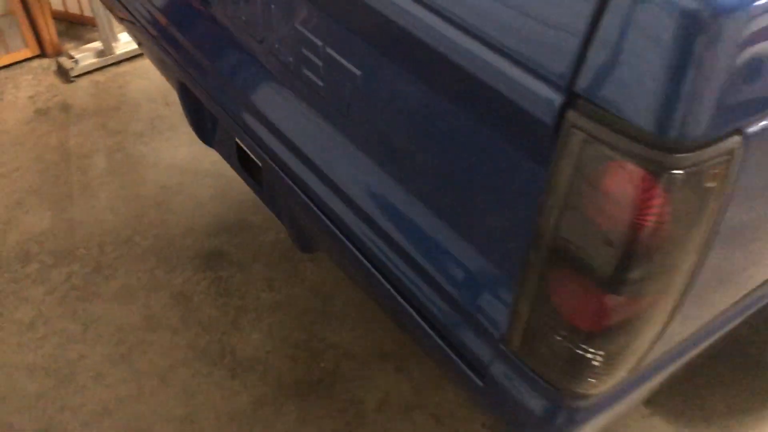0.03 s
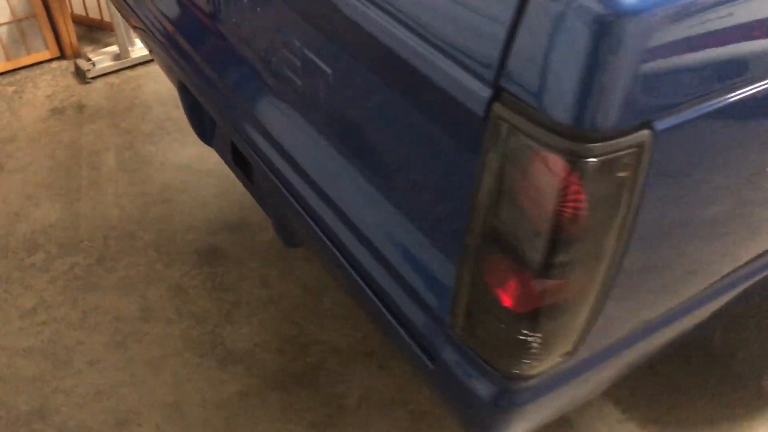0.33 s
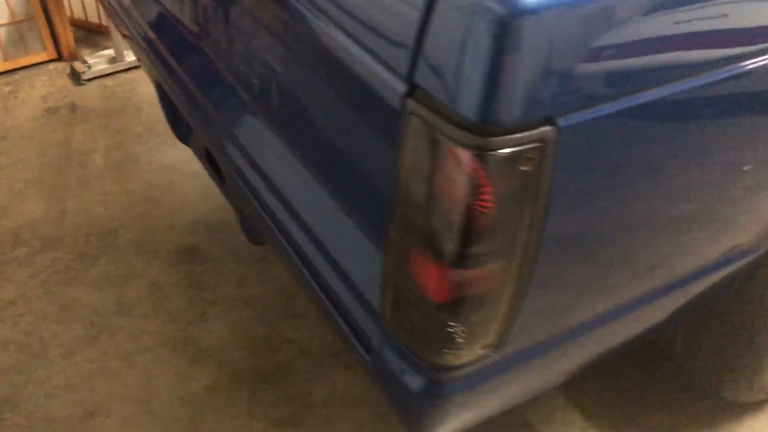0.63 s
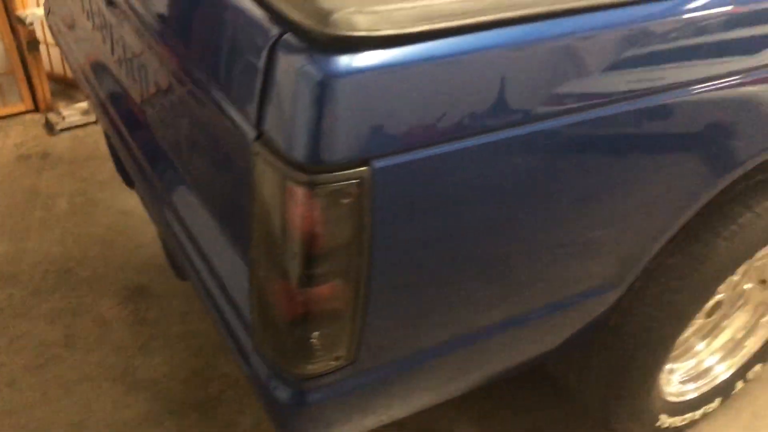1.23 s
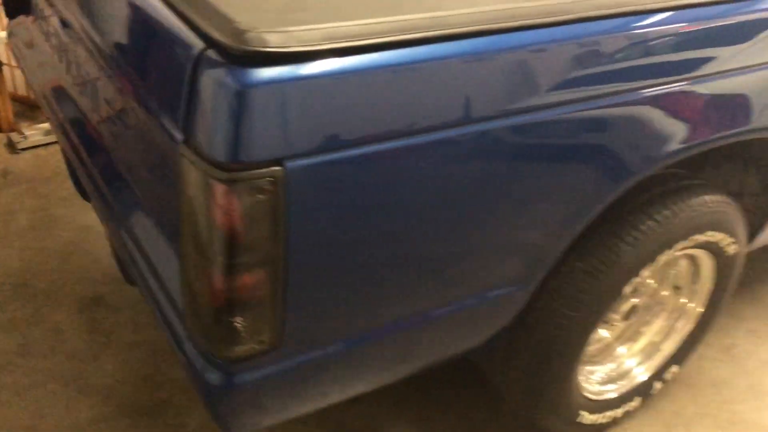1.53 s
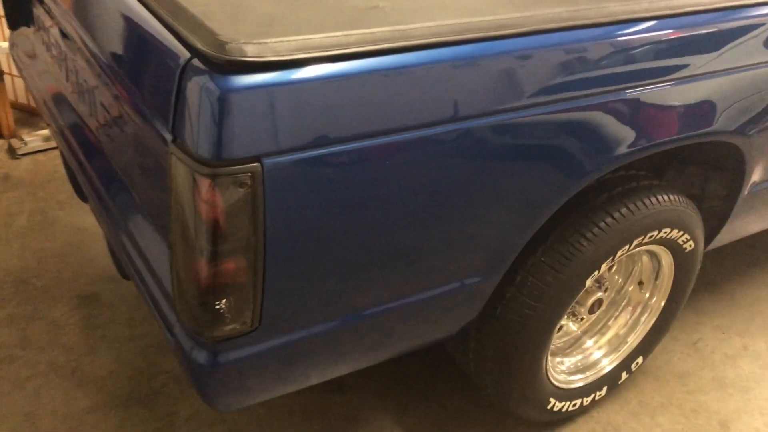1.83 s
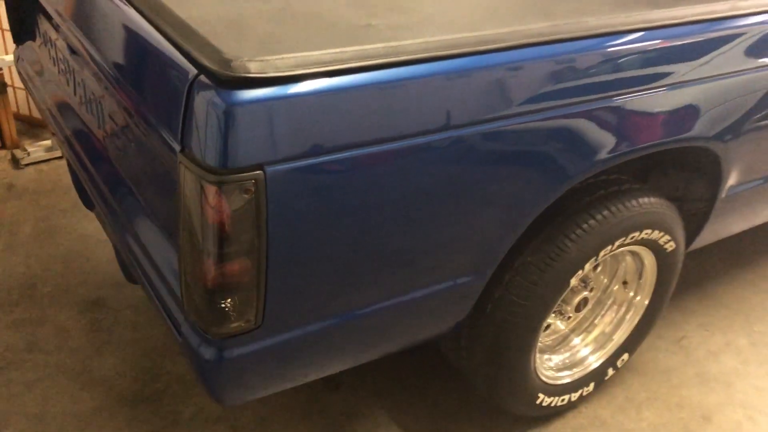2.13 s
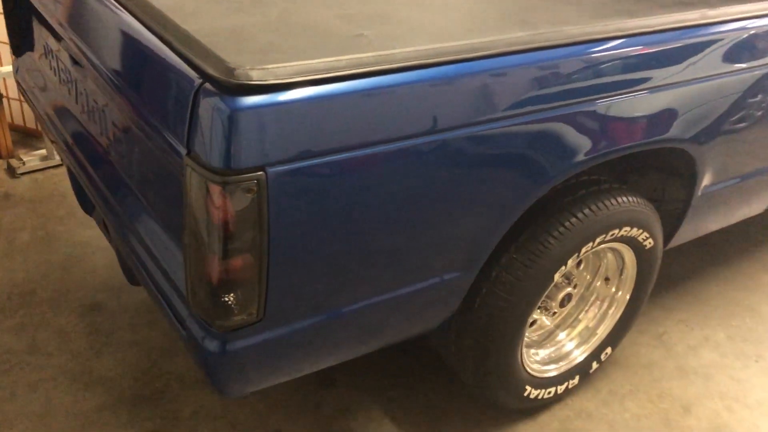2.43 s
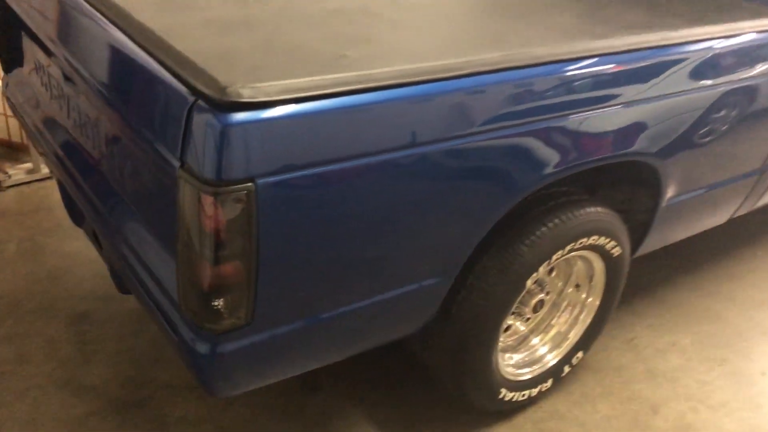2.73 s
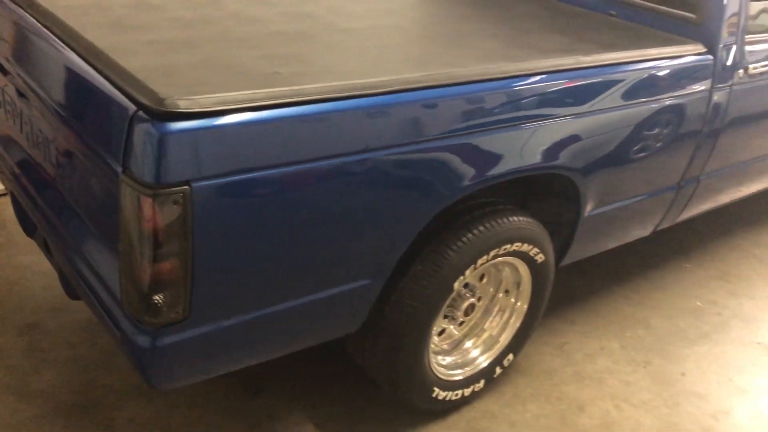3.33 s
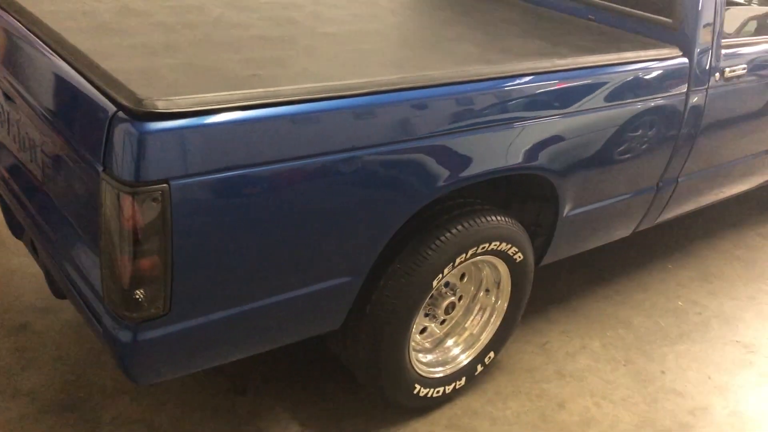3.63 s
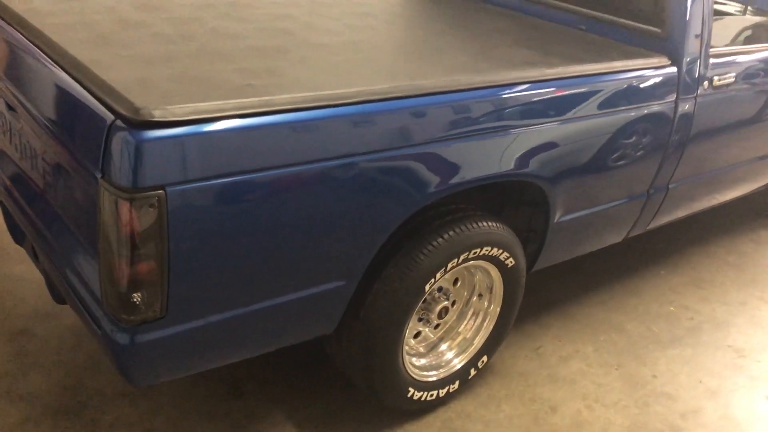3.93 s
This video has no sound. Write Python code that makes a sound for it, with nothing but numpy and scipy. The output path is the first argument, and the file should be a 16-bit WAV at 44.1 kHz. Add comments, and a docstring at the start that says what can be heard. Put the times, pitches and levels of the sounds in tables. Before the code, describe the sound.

A truck engine idles with a deep, pulsing rumble, heard close behind the exhaust in a garage. The microphone walks round to the side, where the drone eases and faint ticking joins the metal rattle and steady hiss.

```python
"""A V8 pickup idles in a garage, heard while walking from the tailgate round to its side.
At first the exhaust is close: it drones at the firing rate, lopes with the uneven pulses of the two
banks, and every firing thuds and rings in the pipe, while a loose metal shield buzzes. Towards the
corner, near two seconds in, the chugs shift their balance and a valve tick comes forward. At the side
the drone is softer. All the way, engine-bay metal rings faintly and fan and belts hiss."""
import sys
import numpy as np
from scipy import signal
from scipy.fft import rfft, irfft
from scipy.io import wavfile

SR = 44100
rng = np.random.default_rng(int(sys.argv[2]) if len(sys.argv) > 2 else 0)


def int16_out(signal):
    """Quantize to a 16-bit WAV file."""
    q = np.round(np.clip(np.atleast_2d(signal).T, -1, 1) * 32767)
    wavfile.write(sys.argv[1], SR, q.astype(np.int16))


N = 176400
T = np.arange(N) / SR
CYLINDER_COUNT = 8
TICK_PLACE = .59   # share of an engine cycle


def exhaust_drone(cycle, waver_hz=4.8, start_place=.1169, fade_db_per_s=.7):
    """Exhaust orders, multiples of the cycle rate: four strong ones beat into the lope, weak ones fill in."""
    # Each row: time in seconds, then the level in dB of each of the four strong orders.
    strong_levels = [(0, -13.5, -57, -27, -22), (0.5, -15, -49, -28, -24.5), (1.0, -15.5, -30, -30, -22.5),
                     (1.45, -15.4, -29, -36, -27), (2.0, -17, -25.5, -32, -29),
                     (2.45, -16, -26.5, -32, -28), (2.9, -18, -24, -28, -31), (3.35, -17, -25, -31, -28),
                     (4, -19.5, -24, -28.5, -31.5)]
    # Each row: a weak order, its level in dB halfway through the walk.
    weak_orders = [(6, -56), (7, -48), (9, -36), (10, -44), (12, -44), (14, -48), (15, -41.5), (17, -44.5),
                   (19, -57), (21, -42)]
    out = 0
    for order, db in zip((8, 11, 13, 16), in_time(strong_levels)):
        gain = from_db(db + .4 * drift(waver_hz))
        out += gain * np.sin(2 * np.pi * order * (cycle - start_place))
    for order, db in weak_orders:
        gain = from_db(db + 1.8 * drift(waver_hz / 2) - fade_db_per_s * (T - T.mean()))
        out += gain * np.sin(2 * np.pi * (order * cycle + rng.random()))
    return np.sqrt(2) * out


def exhaust_chugs(cycle, spread_db=1.35, jitter_s=.00023):
    """The same uneven blows come round every cycle, each booming in one exhaust resonance."""
    # Each row: place as a share of the cycle, pitch in Hz, swell time in seconds,
    # then peak level in dB behind the truck, at its corner and at its side.
    chugs = [(0.1671, 202, 0.0064, -27, -25, -32), (.31, 298.5, .0035, -24, -28.5, -35.5),
             (.975, 260.3, 0.0041, -29.5, -27.5, -30.5), (.49, 274, 0.0045, -29.5, -35, -33),
             (.59, 196, 0.0073, -31.5, -31, -33.5), (.81, 193, 0.016, -30, -41, -46),
             (.63, 292, 0.0026, -32, -37.5, -31), (.94, 633, 0.0053, -31.5, -37, -46),
             (0.0899, 638, 0.0081, -42.5, -35, -43), (0.58, 565, 0.0062, -33.5, -39.5, -45),
             (.61, 635, 0.0039, -43, -35.5, -45), (.85, 644, 0.0047, -34.5, -47, -44)]
    walk_s = (.44, 1.83, 3.84)   # the listener is behind, at the corner, at the side
    out, t = 0, T[:SR // 10]
    for place, hz, swell, *levels in chugs:
        times = passing(cycle, place + np.arange(int(cycle[-1] + 1)))
        jitter, spread = rng.standard_normal((len(times), 2)).T
        blows = clicks(times + jitter_s * jitter, np.interp(times, walk_s, levels) + spread_db * spread)
        boom = t / swell * np.exp(1 - t / swell) * np.sin(2 * np.pi * hz * t)
        out += signal.fftconvolve(blows, boom)[:N]
    return out


def pipe_tones(cycle, waver_db=1.86, wander_rad=.83):
    """Higher exhaust orders sing in the pipe's resonances: hollow, wavering tones over the drone."""
    # Each row: time in seconds, then the level in dB of each of the four singing orders.
    tone_levels = [(0, -40, -50, -55, -38), (.25, -50, -61, -49, -46), (.42, -45, -59.5, -39, -49),
                   (.75, -46, -53, -51, -49.5), (1.4, -48, -51, -59, -45.5), (2.3, -47, -60, -54, -52),
                   (3.1, -45, -51.5, -62, -48), (3.4, -43.5, -49, -50, -54), (4, -42, -54, -55, -52)]
    out = 0
    for order, db in zip((32, 60, 65, 72), in_time(tone_levels)):
        gain = from_db(db + waver_db * drift(11.3))
        out += gain * np.sin(2 * np.pi * order * cycle + wander_rad * drift(6))
    return np.sqrt(2) * out


def firings(cycle, start_place=.015, spread_db=2, jitter_s=.00015, roughness=.38, hiss_db=-48.5):
    """Each cylinder's pressure pulse and turbulent puff ring the tailpipe, with a short hiss of gas."""
    # The accent of each of the eight firings in a cycle, in dB.
    accents = [2, -1, -1.7, -1.6, -0.68, 2.3, -0.69, -0.3]
    # Tailpipe resonances. Each row: pitch in Hz, width in Hz, relative level in dB.
    pipe_modes = [(284.8, 25, 0), (351.3, 43, -3), (396, 25, -3.5), (519, 22, -1.5), (567.5, 35, -3.5),
                  (637.3, 25, -1.5), (705, 11, -16), (900, 52, -13.5)]
    # Fader for the pipe's ring. Each row: time in seconds, level in dB.
    ring_level = [(0, -42.5), (1.4, -45), (2.5, -45), (4, -45)]
    # Colour of the gas hiss. Each row: frequency in Hz, relative density in dB.
    hiss_colour = [(200, -19), (450, 4.5), (900, -2.5), (1500, -8), (3000, -11), (7000, -17),
                   (15000, -29.5)]
    firing = np.arange(int(cycle[-1] + 1) * CYLINDER_COUNT)
    jitter, spread = rng.standard_normal((len(firing), 2)).T
    times = passing(cycle, start_place + firing / CYLINDER_COUNT) + jitter_s * jitter
    pulses = clicks(times, np.array(accents)[firing % CYLINDER_COUNT] + spread_db * np.tanh(spread))
    turbulence = die_away(pulses, seconds=.0062) * rng.standard_normal(N)
    ring = resonate(rms_one(pulses) + roughness * rms_one(turbulence), pipe_modes)
    hiss = die_away(pulses, seconds=.0088) * noise(hiss_colour)
    return from_db(in_time(ring_level)[0]) * rms_one(ring) + from_db(hiss_db) * rms_one(hiss)


def loose_shield(cycle, touches_per_s=500, spread_db=3.5, shake_db=2, lift_db=1):
    """The engine shakes a sheet-metal shield: many light touches blur into a buzz, a few hit hard."""
    # Modes of the sheet. Each row: pitch in Hz, width in Hz, relative level in dB.
    modes = [(1860, 48, -1), (1954, 35.6, 0), (2047, 53, -5), (2405, 22, -15.5)]
    # Fader for the buzz. Each row: time in seconds, level in dB before the lift.
    buzz_level = [(0, -46.5), (.17, -43), (.28, -49), (.68, -48), (.82, -42.5), (.93, -48.5), (1.1, -42),
                  (1.3, -52.5), (1.41, -43.5), (1.55, -47.5), (2.2, -48), (2.3, -44.5), (2.43, -49),
                  (2.55, -45.5), (2.72, -51.5), (2.82, -48.5), (3.4, -50), (4, -46)]
    # Hard touches. Each row: start in seconds, dry peak level in dB.
    hard_touches = [(0.064, -35.5), (0.18, -38), (0.801, -28.5), (1.211, -35), (2.13, -33), (2.257, -34),
                    (2.544, -30), (2.625, -33.5), (2.82, -33), (3.164, -37)]
    surge_db = shake_db * np.cos(2 * np.pi * 3 * (cycle - TICK_PLACE))   # three surges a cycle
    light_touches = (rng.random(N) < touches_per_s / SR) * rng.choice([-1, 1], N)
    strength = from_db(spread_db * rng.standard_normal(N) + surge_db)
    buzz = rms_one(garage(resonate(light_touches * strength, modes)))
    touch_peak = np.abs(resonate(T == 0, modes)).max()
    hits = garage(resonate(clicks(*np.transpose(hard_touches)), modes)) / touch_peak
    return from_db(in_time(buzz_level)[0] + lift_db) * buzz + hits


def valve_tick(cycle, spread_db=4):
    """One valve ticks once a cycle: a short, bright burst of uneven strength."""
    # Fader for the tick. Each row: time in seconds, gain in dB.
    level = [(0, -56), (1.5, -49), (4, -47)]
    # Colour of the tick. Each row: frequency in Hz, relative density in dB.
    colour = [(700, -13), (1200, 2), (3000, -5), (6000, 3), (10000, -3), (15500, -11)]
    times = passing(cycle, TICK_PLACE + np.arange(int(cycle[-1] + 1)))
    bursts = die_away(clicks(times, spread_db * rng.uniform(-1, 1, len(times))), seconds=.0083)
    return garage(from_db(in_time(level)[0]) * bursts * noise(colour))


def engine_bay(flicker_db=6, flicker_hz=4, chatter_s=.029):
    """Vibrating brackets and covers ring, each coming and going on its own, with an occasional chink."""
    # Modes of the metal. Each row: pitch in Hz, width in Hz, relative level in dB.
    modes = [(3535, 33, 4), (3720, 39, -2.5), (3905, 35, 4), (4480, 40, 0), (4620, 36, -2), (5010, 35, -4),
             (5420, 46, -3), (6130, 49, -7), (6740, 65, -5)]
    # Fader for the ringing. Each row: time in seconds, level in dB.
    ring_level = [(0, -57), (1.2, -56), (1.8, -52.5), (2.3, -57), (4, -55)]
    # Small metallic chinks. Each row: start in seconds, peak level in dB.
    chink_cues = [(.19, -44), (.55, -46), (1.6, -41), (1.85, -42), (2.82, -42), (3.15, -44), (3.84, -45)]
    shaking = rng.standard_normal(N)
    rings = 0
    for mode in modes:
        rings += from_db(flicker_db * np.tanh(drift(flicker_hz))) * resonate(shaking, [mode])
    chatter = rng.standard_normal(N) * np.exp(-T / chatter_s)
    chink = resonate(chatter, modes)[:SR // 4]
    chinks = signal.fftconvolve(clicks(*np.transpose(chink_cues)), chink / np.abs(chink).max())[:N]
    return from_db(in_time(ring_level)[0]) * rms_one(rings) + chinks


def fan_and_belts(cycle, wash_db=-41, whine_db=-62.5, whine_order=140.6):
    """A steady bed of moving air, with the faint, wavering whine of a belt-driven accessory."""
    # Colour of fan, belts and room wash. Each row: frequency in Hz, relative density in dB.
    colour = [(25, -16), (45, -6), (70, 6), (150, 3.5), (300, 4.5), (450, 0), (800, -1.5), (1500, -7.5),
              (2300, -8.5), (3000, -13), (5000, -13.5), (6800, -14.5), (9000, -21.5), (12000, -26),
              (15600, -28.5)]
    whine = from_db(whine_db + 4 * drift(8)) * np.sqrt(2) * np.sin(2 * np.pi * whine_order * cycle)
    wash = from_db(wash_db + 1.02 * drift(11)) * noise(colour)
    return wash + whine


def garage(x, t60_s=.45, wet_db=-4, predelay_s=.006):
    """Hard walls add a diffuse echo to the dry sound."""
    tail = rng.standard_normal(N) * from_db(-60 * T / t60_s) * (T > predelay_s)
    return x + from_db(wet_db) * signal.fftconvolve(x, tail / np.sqrt(np.sum(tail ** 2)))[:N]


def from_db(db):
    """Decibels to gain."""
    return 10 ** (np.asarray(db) / 20)


def rms_one(x):
    """Scale to unit rms."""
    return x / np.sqrt(np.mean(x ** 2) + 1e-20)


def in_time(rows):
    """Breakpoints to automation curves, one for each column after the time."""
    seconds, *columns = np.transpose(rows)
    return [np.interp(T, seconds, column) for column in columns]


def drift(rate_hz):
    """A slow random wobble of unit rms, smoothed above the given rate."""
    hop, settle = 40, 2000   # samples per step, steps of run-in
    pole = np.exp(-2 * np.pi * rate_hz * hop / SR)
    steps = rng.standard_normal(N // hop + settle + 2)
    slow = signal.lfilter([1], [1, -2 * pole, pole * pole], steps)[settle:]
    return np.interp(np.arange(N) / hop, np.arange(len(slow)), rms_one(slow))


def noise(colour):
    """Noise of unit rms in the given colour."""
    hz, db = np.transpose(colour)
    bin_hz = np.maximum(np.arange(N // 2 + 1) * SR / N, 1)
    gain = from_db(np.interp(np.log(bin_hz), np.log(hz), db))
    return rms_one(irfft(rfft(rng.standard_normal(N)) * gain, N))


def clicks(times, db):
    """One impulse at each time."""
    out, inside = np.zeros(N), (times >= 0) & (times < T[-1])
    np.add.at(out, (times[inside] * SR).astype(int), from_db(db)[inside])
    return out


def die_away(x, seconds):
    """Give each impulse an exponential tail."""
    return signal.lfilter([1], [1, -np.exp(-1 / (seconds * SR))], x + 1e-18)


def resonate(x, modes):
    """Parallel resonances with alternating signs."""
    out = 0
    for k, (hz, width, db) in enumerate(modes):
        r = np.exp(-np.pi * width / SR)
        ring = signal.lfilter([1, 0, -1], [1, -2 * r * np.cos(2 * np.pi * hz / SR), r * r], x + 1e-18)
        out += (-1) ** k * from_db(db) * (1 - r * r) / 2 * ring
    return out


def passing(cycle, marks):
    """The times at which the engine reaches the given points of its rotation."""
    return np.interp(marks, cycle, T, left=-1, right=2 * T[-1])


def scene():
    """A mono mix around one engine rotation, counted in cycles of eight firings."""
    # The slightly unsteady idle. Each row: time in seconds, firings per second.
    firing_rate = [(0.0, 70.2), (0.4, 70.02), (0.5, 70.3), (0.8, 69.68), (0.9, 68.6), (1.4, 70.31),
                   (1.7, 69.2), (2.1, 70.4), (2.4, 70.99), (2.6, 71.4), (2.9, 68.5), (3.4, 70.7),
                   (4.0, 71.2)]
    cycle = np.cumsum(in_time(firing_rate)[0]) / SR / CYLINDER_COUNT
    exhaust = exhaust_drone(cycle) + pipe_tones(cycle) + exhaust_chugs(cycle) + firings(cycle)
    return (exhaust + loose_shield(cycle) + valve_tick(cycle) + engine_bay() + fan_and_belts(cycle))[None]


def record(dry, cutoff_hz=15700):
    """A steep low-pass takes off the very top."""
    return signal.sosfilt(signal.ellip(10, .1, 80, cutoff_hz, fs=SR, output="sos"), dry)


dry = scene()
out = record(dry)
int16_out(out)
```